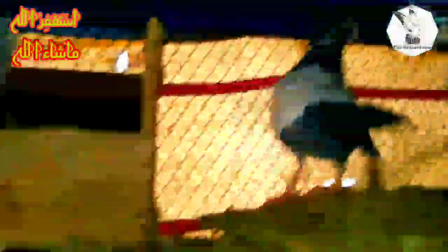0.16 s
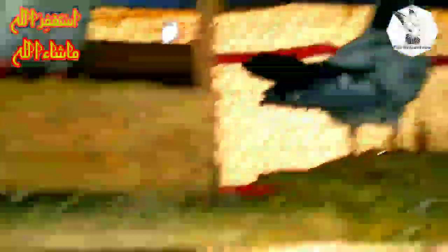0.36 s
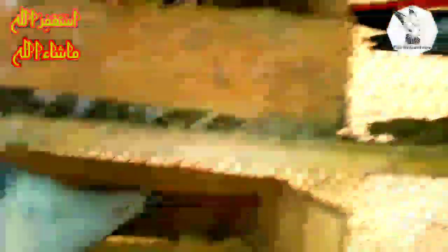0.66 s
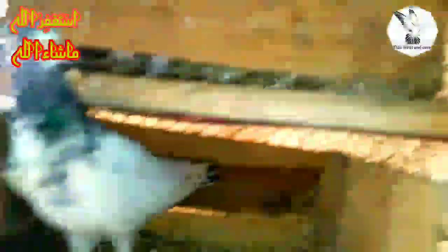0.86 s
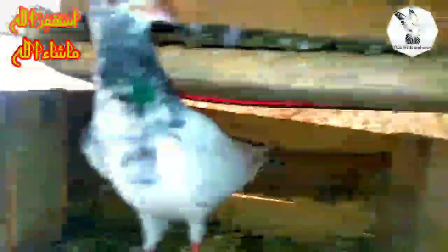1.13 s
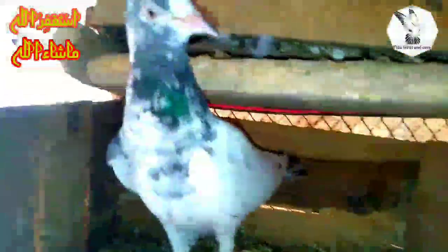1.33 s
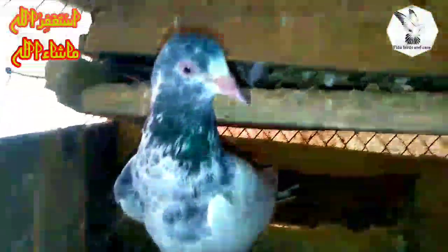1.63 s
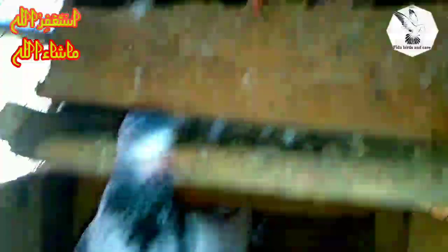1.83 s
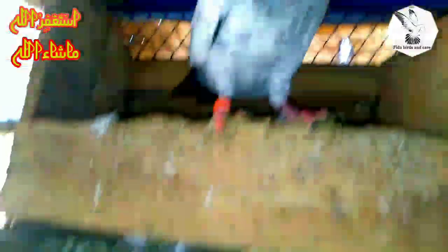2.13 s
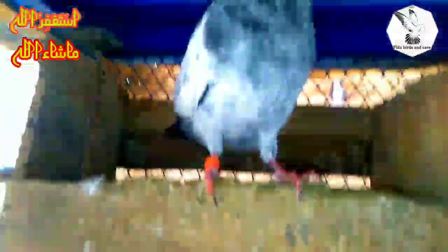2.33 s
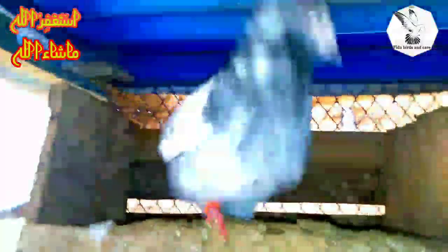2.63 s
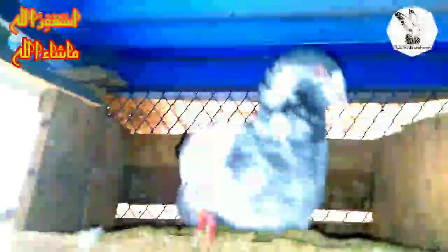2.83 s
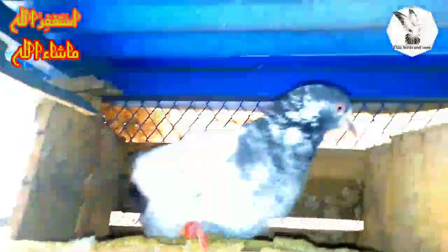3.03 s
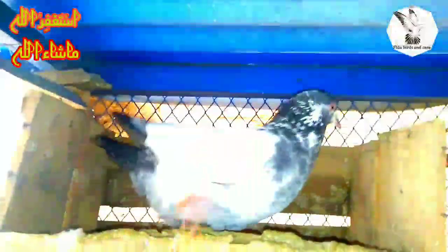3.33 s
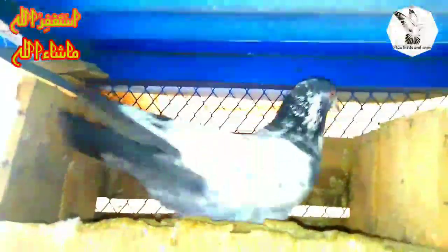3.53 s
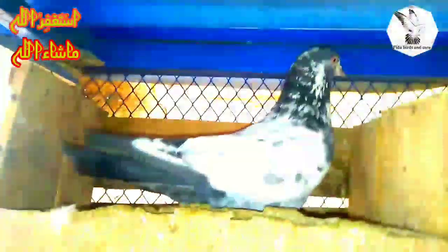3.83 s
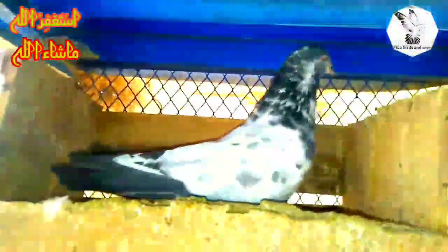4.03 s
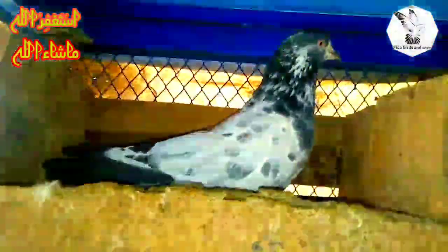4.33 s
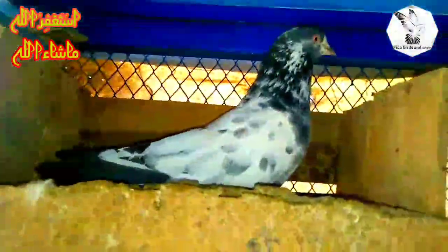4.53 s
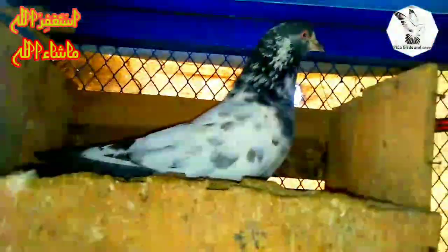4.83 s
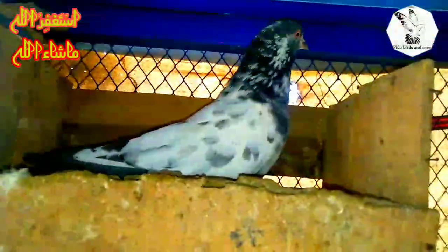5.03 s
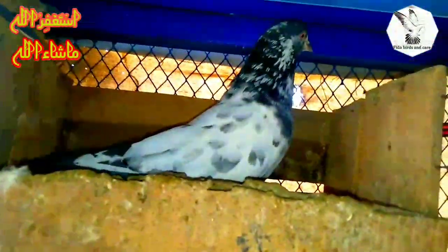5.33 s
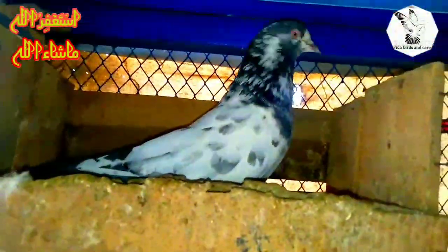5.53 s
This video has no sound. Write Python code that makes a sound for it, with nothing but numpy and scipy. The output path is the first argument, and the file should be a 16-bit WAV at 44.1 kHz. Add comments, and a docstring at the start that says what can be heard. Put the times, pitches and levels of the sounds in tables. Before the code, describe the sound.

Small crisp clicks and light rustling, like claws and feathers on boards or fingers on the microphone, dot a quiet outdoor background of rumble and thin hiss. Midway the contacts thicken into a scratchy cluster while a pigeon grunts and coos softly, low and throaty. It growls, coos once more, then falls silent; a few scuffs and soft wooden bumps close the scene, with barely any reverberation.

```python
"""A pigeon coos softly twice in a wooden nest box of a wire-mesh loft, with low throaty grunts before,
between and after. The coo is a frequency-modulated sine with resonance-filtered overtones; grunts are
impulses ringing modes. Close ticks, scuffs and rustle (claws and feathers on boards, or fingers on the
device) are filtered noise and slips; bumps are struck modes, and a thin whistle is a wavering sine.
Spectrally shaped noise makes the faint outdoor rumble and the microphone's hiss underneath."""
import sys
import numpy as np
from scipy import signal
from scipy.io import wavfile

SR = 44100
rng = np.random.default_rng(int(sys.argv[2]) if len(sys.argv) > 2 else 0)


def dump_mix(stems):
    """Bounce the given channels to the path in sys.argv[1] as a 16-bit WAV at rate SR."""
    frames = np.atleast_2d(stems).T  # one column per channel
    limited = np.clip(frames, -1, 1)  # hard clip at full scale
    pcm = np.round(limited * 32767).astype(np.int16)
    wavfile.write(sys.argv[1], SR, pcm)


N = 249606

# spectra of the hiss and rumble, of scraping and of the boards: (frequency [Hz], relative density [dB])
AIR_SPECTRUM = [(12, -23.5), (20, 4), (40, -14), (85, -16), (177, -23.5), (210, -23.5), (241, -27.5),
                (642, -29.5), (1090, -31), (2390, -38.5), (2910, -67), (5380, -61), (8180, -41),
                (10200, -45.5), (14700, -42.5), (16000, -56.5)]
SCRAPE_SPECTRUM = [(1760, -11), (3000, -13.5), (3860, -12), (4200, -13), (4900, -16), (6090, -13.5),
                   (6760, -12.5), (7250, -6), (8170, 0), (9800, -7.5), (13200, -10), (14900, 0),
                   (16000, -17)]
BOARD_SPECTRUM = [(100, -15), (200, -4.5), (600, 6.5), (900, -12.5), (1200, 8), (3000, -3.5), (5000, -9)]
# light rustling: (time [s], relative treble level [dB], relative body level [dB])
RUSTLE_LEVELS = [(0, -70.5, -70), (0.40, -73, -80.5), (0.62, -63.5, -70), (0.9, -74.5, -82),
                 (1.33, -74, -88), (1.44, -63.5, -78), (1.62, -72.5, -81), (1.9, -67, -69),
                 (2.42, -65, -85.5), (2.76, -57.5, -56.5), (3.15, -59.5, -59.5), (3.40, -69.5, -69),
                 (3.58, -58.5, -85), (3.92, -74, -76), (4.19, -60.5, -90), (4.68, -76.5, -84),
                 (5.10, -69, -68), (5.21, -52, -59.5), (5.40, -60.5, -72), (5.66, -69, -88)]
# hollow body excited by friction: (frequency [Hz], bandwidth [Hz], relative gain [dB])
BODY_RESONANCES = [(566, 340, -10), (1198, 67, -1), (1237, 170, -10), (1453, 350, -1), (1912, 127, -4),
                   (2130, 230, -6.5), (2515, 210, -4.5), (2830, 370, -4), (3380, 28, -17.5)]
# sharp ticks: (time [s], relative body level [dB], relative treble level [dB], decay [s], contact pitch [Hz])
TICK_EVENTS = [(0.043, -58, -46, 0.0034, 1050), (0.096, -49, -40.5, 0.0043, 2160),
               (0.1453, -58.5, -52, 0.012, 1860), (0.2175, -60, -61, .007, 1830),
               (0.243, -56.5, -55.5, 0.018, 1810), (0.307, -58, -59, 0.0035, 1830),
               (0.36, -60.5, -57, 0.0032, 1290), (0.5673, -46.5, -48, .003, 1020),
               (0.5903, -50, -67, .004, 1550), (0.604, -78, -46, 0.0035, 1450),
               (0.645, -61, -45, 0.0038, 1740), (0.683, -51.5, -53, 0.0057, 1720),
               (0.727, -62, -72, .006, 1880), (0.7833, -60, -72, .003, 1970),
               (0.9228, -60.5, -66, .003, 1080), (1.286, -54, -46, 0.0042, 1080),
               (1.8119, -55, -57, .0026, 1120), (1.865, -49, -52.5, 0.0022, 1080),
               (2.244, -45.5, -41, 0.0024, 2060), (2.6237, -42, -41.5, .0036, 1240),
               (2.6423, -37, -34.5, 0.0018, 2200), (2.649, -34, -35.5, 0.0045, 2240),
               (2.659, -37.5, -38.5, .014, 1750), (2.6925, -33, -36.5, 0.012, 1860),
               (2.7577, -41, -47.5, 0.0017, 1670), (2.8272, -33, -41, 0.0028, 1590),
               (2.846, -48, -27.5, 0.0063, 1800), (2.9, -38, -62, 0.0074, 1750),
               (2.9127, -35, -27.5, 0.003, 1860), (2.9263, -35.5, -30, 0.0016, 1550),
               (3.0195, -53, -34, 0.0047, 2350), (3.1434, -45, -43, 0.0027, 2140),
               (3.1936, -42.5, -43, 0.0016, 2250), (3.2174, -45.5, -51, 0.002, 1850),
               (3.2654, -53, -52.5, .003, 1660), (3.378, -58, -75, 0.0026, 1630),
               (4.1714, -46, -51, 0.0011, 1790), (4.46, -92, -48.5, 0.0069, 1370),
               (5.2373, -49.5, -41, 0.012, 1480), (5.3216, -61.5, -45, 0.012, 1400),
               (5.405, -56.5, -54, .0036, 1720)]
# scuffs that swell before they die:
# (time [s], relative body level [dB], relative treble level [dB], rise [s], decay [s], contact pitch [Hz])
SCUFF_EVENTS = [(0.521, -45, -62, 0.0084, .005, 2200), (0.5324, -39.5, -39, 0.0063, 0.0046, 1580),
                (0.614, -58.5, -48.5, 0.0038, 0.012, 1910), (2.134, -65.5, -63.5, 0.012, .008, 1190),
                (2.33, -71.5, -54, 0.018, .004, 1380), (2.565, -53, -50, 0.0091, 0.0089, 1260),
                (2.6785, -34, -44, .0068, 0.0087, 1760), (2.7484, -44.5, -58, 0.005, 0.0028, 1450),
                (2.8516, -27.5, -31.5, 0.0027, 0.0054, 1780), (2.938, -45, -47, 0.0081, 0.0025, 1540),
                (2.9587, -45, -56, 0.0035, 0.0059, 1400), (3.165, -41.5, -38.5, 0.0064, 0.0078, 2000),
                (3.3057, -50, -62, 0.0088, 0.0017, 1840), (3.4277, -29.5, -44, 0.0024, 0.0053, 1400),
                (3.44, -32, -34, 0.0041, 0.008, 1670), (3.951, -61, -61, 0.0062, 0.016, 1410),
                (5.1774, -43.5, -39.5, 0.0055, 0.0084, 1360), (5.276, -72, -42.5, 0.008, 0.011, 1470),
                (5.372, -85, -48, 0.013, 0.0071, 1700), (5.492, -79, -51.5, 0.011, 0.025, 1430)]
# range of the small rings that differ from contact to contact: (lowest [Hz], highest [Hz])
PING_RANGE = (2510, 6980)
# dull bumps on the boards: (time [s], knock impulse level [dB], thud impulse level [dB])
BUMP_EVENTS = [(0.045, -48.5, -60), (0.571, -41.5, -68), (1.288, -48.5, -71), (4.553, -50, -44.5),
               (5.180, -39, -65), (5.241, -48, -50), (5.321, -50, -50)]
# modes of the knock and of the thud under it: (frequency [Hz], relative gain [dB], 60 dB decay time [s])
KNOCK_MODES = [(253, -22, 0.13), (450, -18.5, 0.053), (714, -8.5, 0.047), (984, -1.5, 0.019),
               (1220, -7.5, 0.0093)]
THUD_MODES = [(42, -1, 0.062), (105, -6, 0.043), (180, 4.5, 0.019)]
# effort of the soft growl around the coos: (time [s], relative level [dB])
GROWL_LEVELS = [(2.35, -84), (2.58, -69), (2.68, -67.5), (2.93, -52.5), (3.03, -68), (3.30, -59),
                (3.48, -53.5), (3.64, -61), (3.82, -57.5), (4.02, -71), (4.28, -55), (4.45, -92)]
# strongest grunts: (time [s], impulse level [dB], high ring relative to the impulse [dB])
GRUNT_EVENTS = [(2.445, -59.5, -20), (2.463, -57, -18), (2.502, -53.5, -22), (2.750, -49, -20),
                (2.911, -42.5, -25), (3.259, -51, -15), (3.269, -52, -20), (3.297, -48, -21),
                (3.344, -52, -23), (3.67, -47.5, -27), (3.688, -46.5, -25), (3.717, -48.5, 8),
                (3.798, -44, -34), (3.846, -48, -28), (4.299, -60, -9), (4.312, -55, -16)]
# modes of the inflated crop: (frequency [Hz], relative gain [dB], 60 dB decay time [s])
CROP_MODES = [(212, -2, 0.056), (325, 4, 0.0089), (457, -0.5, 0.048), (632, -5, 0.024)]
# held tones of the coos, one list each:
# (time [s], mean pitch [Hz], tone level before shimmer [dB], rattle amplitude [0-1])
COO_CURVES = [
    [(2.940, 348, -64, .2), (2.975, 383, -50, 0.4), (3.005, 389, -60, 0.3), (3.035, 420.2, -57, 0),
     (3.066, 474, -50.5, 0), (3.106, 375.5, -53, 0), (3.135, 416, -57.5, 0), (3.160, 240, -63, 0),
     (3.200, 220, -59, 0.2)],
    [(3.878, 200, -55.5, 0.2), (3.935, 219, -59, 0.19), (3.968, 435, -52, 0.1), (3.985, 394.7, -51, 0.1),
     (4.025, 441.5, -47.5, 0), (4.070, 361.3, -59, 0.16), (4.090, 411.4, -57, 0.2),
     (4.148, 371.3, -56, 0.96), (4.172, 305.3, -57, 0.6), (4.238, 284.5, -51.5, 0.14),
     (4.280, 172, -68, 0.1)],
]
# loud short hoots within the coos: (time [s], mean pitch [Hz], tone level before shimmer [dB], fade [s])
HOOT_EVENTS = [(2.983, 301.5, -48.5, 0.0083), (3.075, 353, -35.5, 0.012), (3.15, 236.8, -44, 0.0104),
               (3.946, 264, -39.5, 0.006), (4.034, 307, -35.5, 0.0091), (4.255, 184.3, -47.5, 0.011)]
# throat and crop resonances for the overtones: (frequency [Hz], bandwidth [Hz], relative gain [dB])
THROAT_RESONANCES = [(480, 200, -1), (637, 160, -1.5), (940, 140, -17.5)]
# thin faint whistle: (time [s], mean frequency [Hz], level [dB])
WHISTLE_CURVE = [(3.44, 1730, -90), (3.50, 1760, -81), (3.85, 1764, -77), (4.00, 1755, -77),
                 (4.07, 1700, -95)]

AIR_LEVEL_DB = -61
TICK_RISE_S, TICK_SHEEN_DB, SCUFF_SHEEN_DB = 0.00034, -7, -8
SHEEN_LOSS = 0.52  # dB of sheen lost per dB by which body outweighs treble: firm contacts are duller
TICK_HZ = 8240  # where the crisp top of every contact rings
# faint ticks fall at random, their levels relative to the rustle curves
FAINT_PER_S, FAINT_DECAY_S = 7.9, 0.0029
FAINT_BODY_DB, FAINT_TREBLE_DB, FAINT_SPREAD_DB = 9, 6, 1
CROP_HIGH_HZ, CROP_HIGH_T60_S = 840, 0.022
HOOT_ATTACK_S = 0.00472
BREAK_SHARPNESS = 3.81  # the pitch gets to the hoot's sooner than the level does
CUTOFF_HZ = 15650


def from_db(db):
    """Logarithmic level: convert decibels to amplitude gain."""
    return 10 ** (np.asarray(db) / 20)


def rms_one(x):
    """Power normalization: scale to an rms of 1."""
    return x / np.sqrt(np.mean(x ** 2) + 1e-20)


def in_time(rows):
    """Linear interpolation: evaluate each column of a curve at every sample."""
    times, *columns = np.transpose(rows)
    return [np.interp(np.arange(N) / SR, times, column) for column in columns]


def drift(rate_hz):
    """Low-pass filtered noise: a smooth random fluctuation of rms 1."""
    r = np.exp(-2 * np.pi * rate_hz / SR)
    noise = rng.standard_normal(N + SR)
    # the first second is dropped so that the filter has settled
    return rms_one(signal.lfilter([1], [1, -2 * r, r * r], noise)[SR:])


def coloured(x, spectrum):
    """Minimum-phase filtering: impose a spectrum causally, at rms 1."""
    hz, db = np.transpose(spectrum)
    grid = np.linspace(0, SR / 2, 4097)
    power = from_db(np.interp(np.log(grid + 1), np.log(hz), db)) ** 2
    # the minimum-phase conversion takes the square root of the power response
    taps = signal.minimum_phase(signal.firwin2(4095, grid, power, fs=SR), n_fft=65536)
    return rms_one(signal.fftconvolve(x, taps)[:N])


def resonate(x, resonances):
    """Parallel resonance: sum two-pole band-passes with alternating signs."""
    out = np.zeros(len(x))
    for k, (hz, width_hz, db) in enumerate(resonances):
        r = np.exp(-np.pi * width_hz / SR)
        poles = [1, -2 * r * np.cos(2 * np.pi * hz / SR), r * r]
        band = (1 - r * r) / 2 * signal.lfilter([1, 0, -1], poles, x)
        out += (-1) ** k * from_db(db) * band
    return out


def ring(clicks, modes):
    """Modal impulse response: each click starts exponentially decaying sines."""
    out = np.zeros(N)
    for hz, db, t60 in modes:
        r = np.exp(-np.log(1000) / (t60 * SR))
        w = 2 * np.pi * hz / SR
        poles = [1, -2 * r * np.cos(w), r * r]
        # the tiny offset keeps the filter clear of denormal numbers
        out += from_db(db) * signal.lfilter([0, np.sin(w)], poles, clicks + 1e-18)
    return out


def clicks_at(times, db):
    """Impulsive excitation: place single-sample clicks."""
    out = np.zeros(N)
    out[np.round(times * SR).astype(int)] = from_db(db)
    return out


def friction(per_s, spread_db):
    """Stick-slip friction: random impulses of either sign and uneven size."""
    slipping = rng.random(N) < per_s / SR
    sign = rng.choice([-1, 1], N)
    return slipping * sign * from_db(spread_db * rng.standard_normal(N))


def burst(x, pressure):
    """Amplitude modulation: shape x by an envelope and give it that envelope's energy."""
    return rms_one(x * pressure) * np.sqrt(np.mean(pressure ** 2))


def air(rumble_hz=130, wander_db=3.0):
    """Stationary shaped noise: steady hiss over a low band that wanders in level."""
    noise = coloured(rng.standard_normal(N), AIR_SPECTRUM)
    low_pass = signal.butter(2, rumble_hz, fs=SR, output="sos")
    rumble = signal.sosfiltfilt(low_pass, noise)
    wander = from_db(wander_db * drift(5.4))
    return from_db(AIR_LEVEL_DB) * (noise + rumble * (wander - 1))


def rustle(treble_db=-3, body_db=-4, flutter_db=1.5, grain_db=-11):
    """Friction noise: fluttering noise and stray crackles excite a crisp top and a hollow body."""
    treble_level, body_level = in_time(RUSTLE_LEVELS)
    flutter = from_db(flutter_db * drift(48))
    grains = rms_one(friction(per_s=74, spread_db=4.5))
    slips = flutter * (rng.standard_normal(N) + from_db(grain_db) * grains)
    body = rms_one(resonate(slips, BODY_RESONANCES))
    hollow = rms_one(body + 0.74 * coloured(slips, BOARD_SPECTRUM))
    treble = from_db(treble_level + treble_db) * coloured(slips, SCRAPE_SPECTRUM)
    return treble + from_db(body_level + body_db) * hollow


def contacts():
    """Poisson-like events: join the listed ticks and scuffs with random faint ticks.

    Rows: (time [s], body level [dB], treble level [dB], rise [s], decay [s], pitch [Hz], sheen [dB]),
    all levels relative."""
    rows = [(*row, SCUFF_SHEEN_DB) for row in SCUFF_EVENTS]
    for s, body, treble, decay, hz in TICK_EVENTS:
        rows.append((s, body, treble, TICK_RISE_S, decay, hz, TICK_SHEEN_DB))
    treble, body = in_time(RUSTLE_LEVELS)
    chance, size = rng.random(N), rng.standard_normal(N)
    pitch_hz = rng.uniform(1370, 1880, N)
    for i in np.flatnonzero(chance < FAINT_PER_S / SR):
        db = FAINT_SPREAD_DB * size[i]
        rows.append((i / SR, body[i] + FAINT_BODY_DB + db, treble[i] + FAINT_TREBLE_DB + db,
                     TICK_RISE_S, FAINT_DECAY_S, pitch_hz[i], TICK_SHEEN_DB))
    return rows


def ticks_and_scuffs(body_db=7, board_db=-12, contact_width_hz=700, tick_width_hz=1100, tick_db=-5,
                     sheen_hz=10500, ping_db=-10, ping_width_hz=160):
    """Source-filter friction: enveloped slips drive a hollow body and a crisp top at each contact."""
    t = np.arange(N) / SR
    slips = friction(per_s=6000, spread_db=2.0)
    board = coloured(slips, BOARD_SPECTRUM)
    crisp = coloured(friction(per_s=6000, spread_db=5.0), SCRAPE_SPECTRUM)
    high_pass = signal.butter(2, sheen_hz, "high", fs=SR, output="sos")
    sheen = signal.sosfiltfilt(high_pass, crisp)
    drive, direct = np.zeros(N), np.zeros(N)
    for s, low_db, top_db, rise, decay, contact_hz, sheen_db in contacts():
        near = slice(max(0, int((s - .05) * SR)), int((s + .1) * SR))
        # exponential rise before the contact time, exponential decay after it
        pressure = np.exp(-np.maximum((s - t[near]) / rise, (t[near] - s) / decay))
        contact = resonate(slips[near], [(contact_hz, contact_width_hz, 0)])
        tick = rms_one(resonate(slips[near], [(TICK_HZ, tick_width_hz, 0)]))
        # each contact also catches two narrow rings at chance pitches
        ping_modes = [(hz, ping_width_hz, 0) for hz in rng.uniform(*PING_RANGE, 2)]
        pings = rms_one(resonate(slips[near], ping_modes))
        sheen_gain = from_db(sheen_db - SHEEN_LOSS * (low_db - top_db))
        top = crisp[near] + (sheen_gain - 1) * sheen[near]
        top = top + from_db(tick_db) * tick + from_db(ping_db) * pings
        drive[near] += from_db(low_db) * burst(contact, pressure)
        direct[near] += from_db(top_db) * burst(top, pressure)
        direct[near] += from_db(low_db + board_db) * burst(board[near], pressure)
    # the body rings on a little after the slips that drive it
    return from_db(body_db) * resonate(drive, BODY_RESONANCES) + direct


def bumps():
    """Modal impact: impulses ring soft wooden knocks over a low thud."""
    s, knock_db, thud_db = np.transpose(BUMP_EVENTS)
    knock = ring(clicks_at(s, knock_db), KNOCK_MODES)
    return knock + ring(clicks_at(s, thud_db), THUD_MODES)


def grunts(beats_per_s=85, unevenness=0.39, soft_hz=950, growl_db=-1, growl_hz=330):
    """Impulse-excited resonance: slow separate beats of the voice ring in the inflated crop."""
    s, db, high_db = np.transpose(GRUNT_EVENTS)
    single = ring(clicks_at(s, db), CROP_MODES)
    single += ring(clicks_at(s, db + high_db), [(CROP_HIGH_HZ, 0, CROP_HIGH_T60_S)])
    # the soft growl is a train of beats at an uneven rate, one per whole cycle
    cycles = np.cumsum(beats_per_s * np.exp(unevenness * drift(40.19))) / SR
    beats = np.diff(np.floor(cycles), prepend=0) * from_db(1 * drift(38))
    soften = signal.butter(1, growl_hz, fs=SR, output="sos")
    soft_beats = signal.sosfilt(soften, beats)
    t = np.arange(N) / SR
    sounding = (t > GROWL_LEVELS[0][0]) * (t < GROWL_LEVELS[-1][0])
    effort = sounding * from_db(in_time(GROWL_LEVELS)[0] + growl_db)
    growl = effort * rms_one(ring(soft_beats, CROP_MODES))
    band = signal.butter(3, [140, soft_hz], "band", fs=SR, output="sos")
    return signal.sosfilt(band, single + growl)


def coo(rows, jitter=0.0122, overtone_db=-3, rolloff_db=-4, shimmer_db=2.63, hoarse_db=-17):
    """Source-filter phonation: a nearly pure closed-beak tone, broken by hoots.

    Its overtones flare as they cross the throat resonances."""
    hz, db, rattle = in_time(rows)
    t = np.arange(N) / SR
    effort = from_db(db)
    for s, hoot_hz, hoot_db, fade in HOOT_EVENTS:
        # Gaussian rise and fall; pitch and effort are drawn towards the hoot's
        push = np.exp(-np.maximum((s - t) / HOOT_ATTACK_S, (t - s) / fade) ** 2)
        broken = np.minimum(1, BREAK_SHARPNESS * push)
        hz = hz + broken * (hoot_hz - hz)
        rattle = rattle * (1 - broken)
        effort = effort + push * (from_db(hoot_db) - effort)
    phase = 2 * np.pi * np.cumsum(hz * (1 + jitter * drift(65))) / SR
    # when the voice rattles, every third cycle is the strong one, which adds a lower line
    tone = np.sin(phase) + rattle * np.sin(2 * phase / 3)
    sounding = (t > rows[0][0]) * (t < rows[-1][0])
    effort = effort * from_db(shimmer_db * drift(63)) * sounding
    # harmonics 2 to 5
    overtones = sum(from_db(overtone_db + rolloff_db * k) * np.sin((k + 2) * phase) for k in range(4))
    # no two cycles are equally strong, which blurs the lines
    uneven = from_db(hoarse_db) * drift(134)
    pure = effort * tone * (1 + uneven)
    throat = resonate(effort * overtones * (1 + 2 * uneven), THROAT_RESONANCES)
    return np.sqrt(2) * (pure + throat)


def whistle(waver=0.0043):
    """Frequency modulation: a thin sine with a slight random waver."""
    hz, db = in_time(WHISTLE_CURVE)
    t = np.arange(N) / SR
    sounding = (t > WHISTLE_CURVE[0][0]) * (t < WHISTLE_CURVE[-1][0])
    phase = 2 * np.pi * np.cumsum(hz * (1 + waver * drift(30))) / SR
    return sounding * from_db(db) * np.sqrt(2) * np.sin(phase)


def loft(x, t60=0.027, wet_db=-15, wall_hz=4000):
    """Reverberation by convolution: decaying noise gives short dull reflections from the boards."""
    t = np.arange(SR // 4) / SR
    decay = np.exp(-np.log(1000) * t / t60)
    tail = rng.standard_normal(len(t)) * decay * (t > .003)
    dull = signal.butter(1, wall_hz, fs=SR, output="sos")
    tail = signal.sosfilt(dull, tail)
    reflections = signal.fftconvolve(x, tail / np.linalg.norm(tail))[:N]
    return x + from_db(wet_db) * reflections


def scene():
    """Superposition: bird and contacts share the loft's reflections, over steady air."""
    touches = rustle() + ticks_and_scuffs() + bumps()
    pigeon = grunts() + sum(coo(rows) for rows in COO_CURVES)
    return (air() + loft(touches + pigeon + whistle()))[None]


def record(dry, low_cut_hz=36):
    """Band limitation: the microphone loses the deepest bass; the top is cut steeply."""
    high_pass = signal.butter(2, low_cut_hz, "high", fs=SR, output="sos")
    thin = signal.sosfilt(high_pass, dry)
    steep_cut = signal.ellip(10, .1, 80, CUTOFF_HZ, fs=SR, output="sos")
    return signal.sosfilt(steep_cut, thin)


dry = scene()
out = record(dry)
dump_mix(out)
```